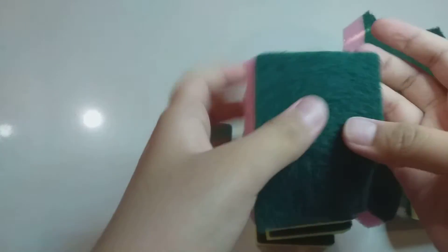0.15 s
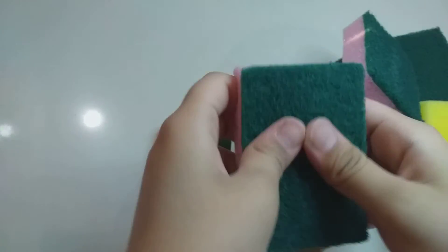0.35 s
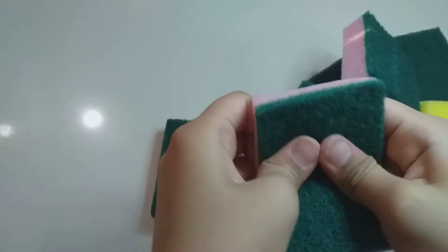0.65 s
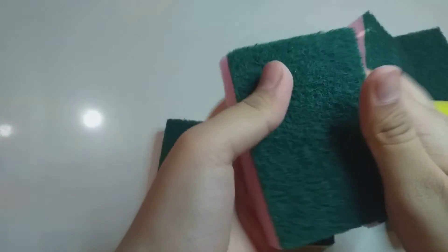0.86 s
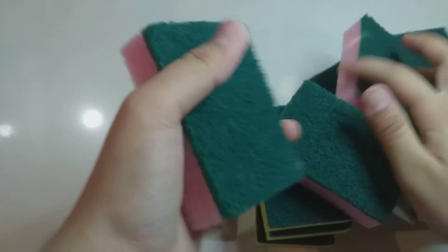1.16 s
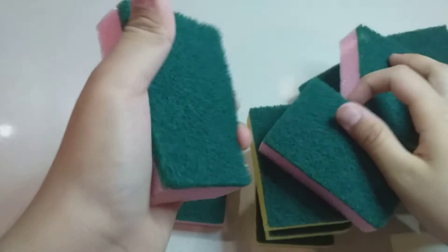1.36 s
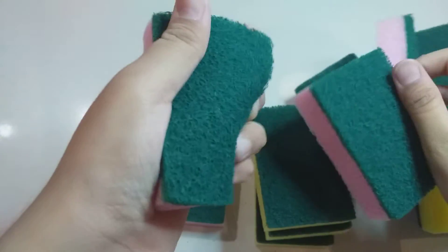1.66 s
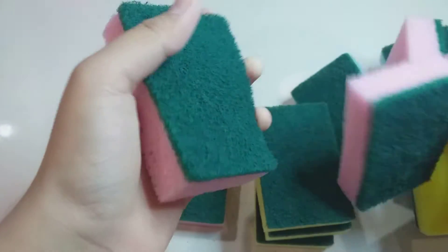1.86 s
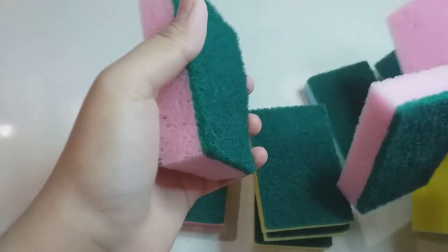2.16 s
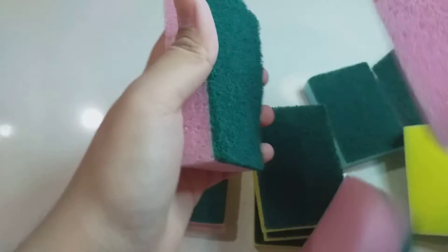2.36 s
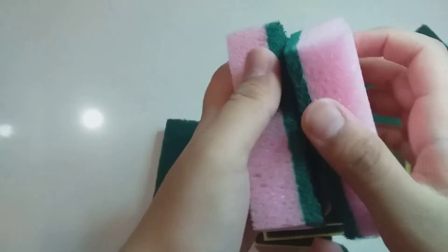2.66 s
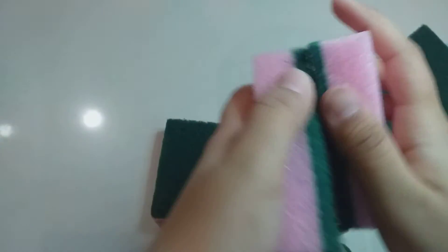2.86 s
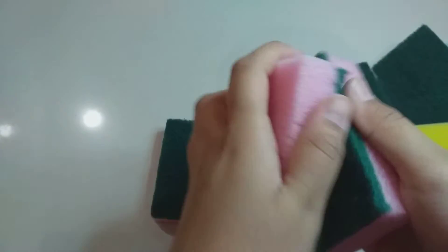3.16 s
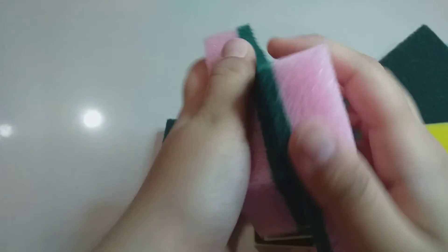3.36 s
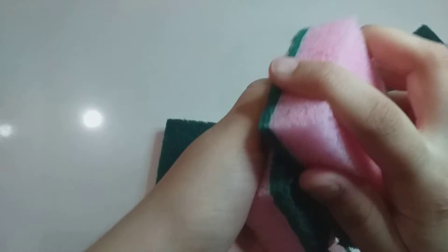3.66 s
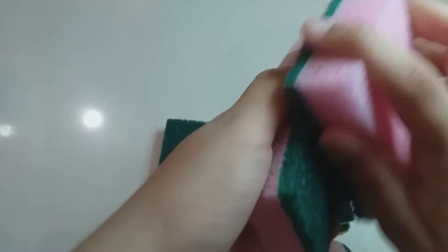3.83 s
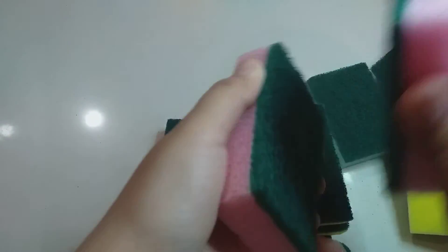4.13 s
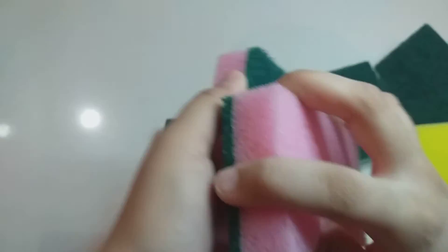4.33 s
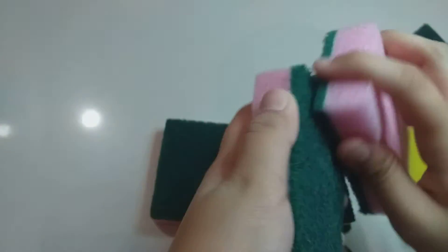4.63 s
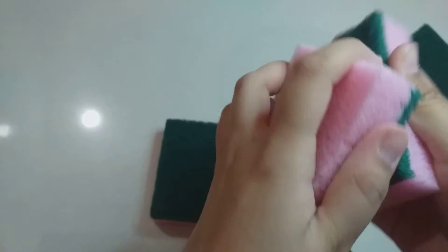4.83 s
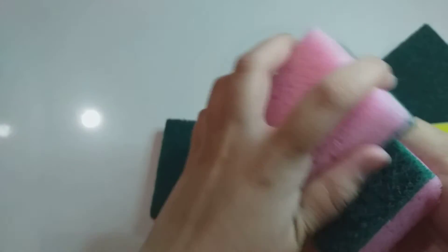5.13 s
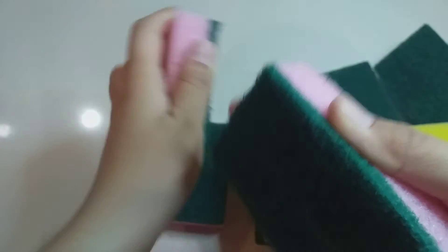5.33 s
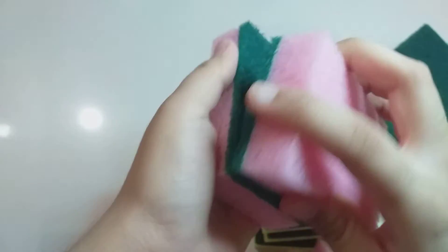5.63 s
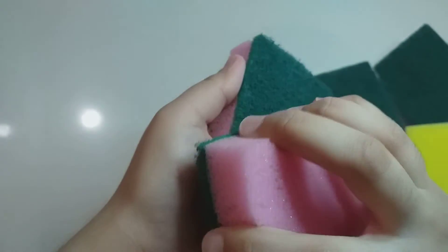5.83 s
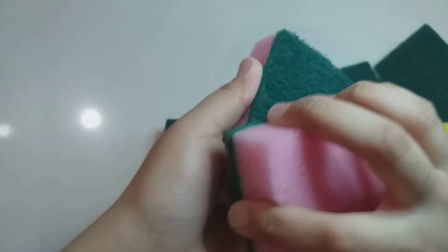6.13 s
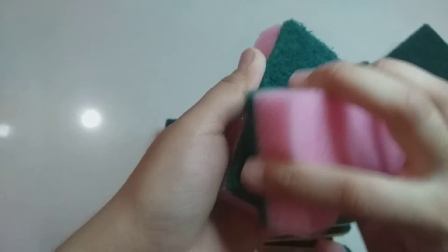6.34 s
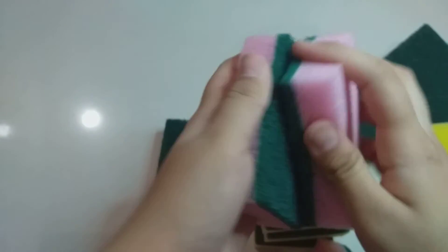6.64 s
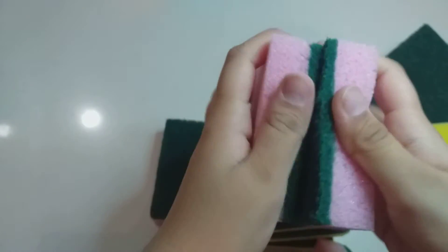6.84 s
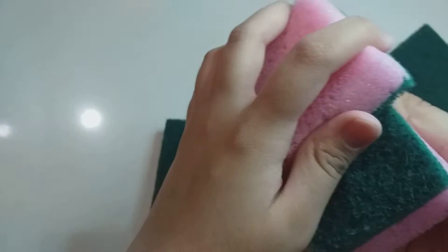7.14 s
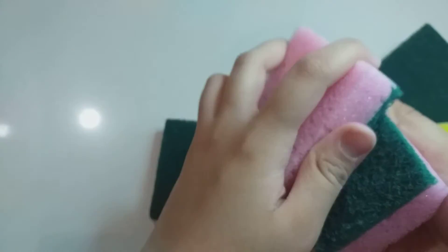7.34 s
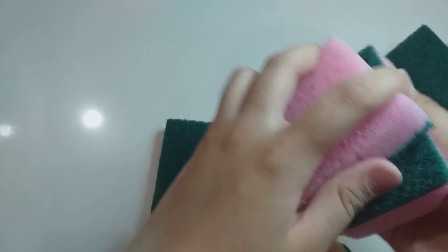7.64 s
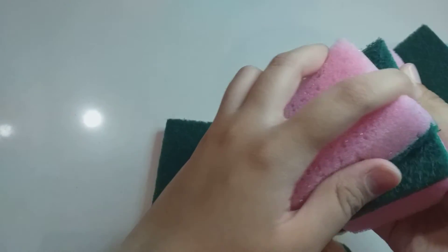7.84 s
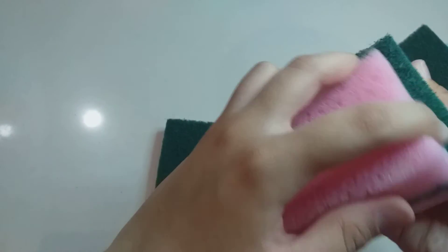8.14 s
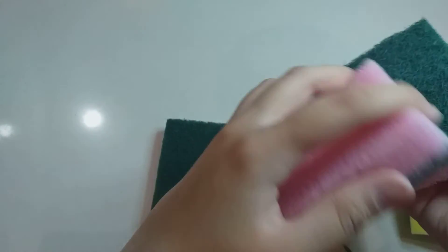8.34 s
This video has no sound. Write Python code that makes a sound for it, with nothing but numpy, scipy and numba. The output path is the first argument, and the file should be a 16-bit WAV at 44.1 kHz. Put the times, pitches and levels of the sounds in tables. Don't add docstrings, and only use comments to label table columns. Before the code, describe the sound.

Dry, stiff scrub pads rasp and crackle against each other very close, with soft knocks and foam squashes over faint room rumble.

```python
import sys
import numpy as np
from scipy import signal
from scipy.fft import rfft, irfft
from scipy.io import wavfile
from scipy.ndimage import uniform_filter1d
from numba import njit

SR = 44100
rng = np.random.default_rng(int(sys.argv[2]) if len(sys.argv) > 2 else 0)


def makeup_ratio(level_db):
    decades = np.asarray(level_db, float) / 20
    return 10 ** decades


def to_wav(s):
    ch = np.atleast_2d(s).T
    pcm = np.round(np.clip(ch, -1, 1) * 32767)
    wavfile.write(sys.argv[1], SR, pcm.astype(np.int16))


N = 374409
T = np.arange(N) / SR


def level(x, db):
    return x * makeup_ratio(db) / np.sqrt(np.mean(x ** 2))


def band(x, lo_hz, hi_hz, order=2):
    return signal.sosfilt(signal.butter(order, [lo_hz, hi_hz], "band", fs=SR, output="sos"), x)


def colour(x, points):
    hz, db = np.transpose(points)
    bins_hz = np.arange(2049) * SR / 4096
    log_gain = np.interp(np.log(bins_hz + 1), np.log(hz), db) * np.log(10) / 20
    cepstrum = irfft(log_gain)
    cepstrum[1:2048] *= 2
    cepstrum[2049:] = 0
    return signal.fftconvolve(x, irfft(np.exp(rfft(cepstrum))))[:N]


def walk(rate):
    hold = int(SR / rate)
    steps = np.repeat(rng.standard_normal(N // hold + 1), hold)
    return 1.69 * uniform_filter1d(steps, hold)[:N]


# centre in Hz, spread in Hz, level in dB.
LAMP_WHINE = [
    (10415, 1500, -85),
    (15260, 400, -91),
]
# pitch in Hz, level in dB.
ROOM_HUM = [
    (242, -64.5),
    (657, -67),
]


def lamps():
    offsets_hz = 299.2 * np.arange(-5, 5)
    waver = 1.5 * walk(13)
    whine = np.zeros(N)
    for centre_hz, spread_hz, db in LAMP_WHINE:
        for offset_hz in offsets_hz:
            line_db = db - 5.4 * (offset_hz / spread_hz) ** 2
            if line_db > -97:
                whine += makeup_ratio(line_db) * np.sin(2 * np.pi * (centre_hz + offset_hz) * T + waver)
    out = makeup_ratio(5.5) * whine
    for hz, db in ROOM_HUM:
        out += makeup_ratio(db + 3.2 * walk(3.03)) * np.sin(2 * np.pi * hz * T + 0.6 * walk(9))
    return out


# frequency in Hz, density in dB per Hz.
ROOM_COLOUR = [(40, -24), (56, -1), (80, -7.5), (112, -1), (165, -1), (310, -3.5), (440, -15), (660, -10.5),
               (1400, -18.5), (4000, -26.5), (5800, -31.5), (9500, -28.5), (13200, -37.5), (15700, -33)]
# time in seconds, pitch in Hz, level in dB.
MOTOR = [
    (.5, 55.6, -75),
    (.65, 55.3, -64),
    (.9, 56.2, -56),
    (1.65, 57.5, -70),
    (1.75, 56.3, -80),
    (3.95, 55.9, -80),
    (4.1, 56.3, -64),
    (4.65, 56.4, -54),
    (5.2, 57, -55),
    (5.35, 57.5, -74.5),
]


def room():
    air = colour(rng.standard_normal(N), ROOM_COLOUR)
    rumble_waver = band(air, 13, 430) * (makeup_ratio(1.4 * walk(12)) - 1)
    air = level(air + rumble_waver, -49.5)
    s, hz, db = np.transpose(MOTOR)
    turn = 2 * np.pi * np.cumsum(np.interp(T, s, hz)) / SR
    motor_gain = makeup_ratio(np.interp(T, s, db) + 1.5 * walk(8.6))
    motor = motor_gain * np.sqrt(2) * (np.sin(turn) + 0.23 * np.sin(2 * turn))
    return air + motor + lamps()


def walls(x, t60_s, wet_db):
    t = np.arange(SR // 2) / SR
    tail = rng.standard_normal(len(t)) * np.exp(-np.log(1000) * t / t60_s) * (t > .003)
    tail *= makeup_ratio(wet_db) / np.sqrt(np.sum(tail ** 2))
    return x + signal.fftconvolve(x, tail)[:N]


# start in seconds, peak in dB, pitch in Hz, ring in seconds, slap in dB relative to the knock.
THUDS = [
    (0.248, -43, 148, 0.074, -14),
    (2.229, -41, 205, 0.068, 7.5),
    (2.537, -27, 140, 0.03, -11),
    (2.596, -35.5, 105, 0.049, -4),
    (2.919, -47, 160, 0.06, 1),
    (3.941, -31, 102, 0.11, -10),
    (4.3, -43, 83.4, 0.067, -15),
    (4.659, -39, 73.4, 0.071, -3),
    (5.251, -28, 161, 0.085, -1),
    (6.428, -43, 190, 0.054, 1),
]


def thuds():
    out = np.zeros(N)
    t = np.arange(6000) / SR
    for (s, db, hz, t60_s, slap_db), noise in zip(THUDS, rng.standard_normal((len(THUDS), len(t)))):
        knock = np.sin(2 * np.pi * hz * t) + 0.41 * np.sin(2 * np.pi * 2.57 * hz * t)
        knock *= np.exp(-np.log(1000) * t / max(t60_s, .01))
        slap = band(noise * np.exp(-t / 0.007), 350, 1100)
        slap *= makeup_ratio(slap_db + 0.5) / np.max(np.abs(slap))
        out[int(s * SR):][:len(t)] += makeup_ratio(db) * (knock + slap)
    return out


def swells(rows, lo_hz, hi_hz, grit):
    coarse = T[::32]
    swell = sum(makeup_ratio(db) * np.exp(-((coarse - s) / half_s) ** 4) for s, db, half_s in rows)
    grains = rng.standard_normal(N) * makeup_ratio(grit * walk(300))
    return np.interp(T, coarse, swell) * level(band(grains, lo_hz, hi_hz), 0)


# middle in seconds, level in dB, half length in seconds.
BRUSHES = [(.54, -59, 0.073), (.82, -60, .06), (1.75, -69, .03), (3.93, -48.5, 0.071), (4.59, -50, .07),
           (6.2, -55, 0.064), (6.45, -56, .07), (7.03, -65, .08), (8.27, -55.5, .08), (3.74, -58, .05),
           (7.98, -60, .06), (7.7, -58, .05), (2.1, -68, .04)]


def brushes():
    return swells(BRUSHES, 6200, 14000, grit=4.5)


# middle in seconds, level in dB, half length in seconds.
SQUASHES = [
    (1.25, -60, 0.22),
    (3.27, -41.5, 0.075),
    (3.52, -40.5, 0.072),
    (5.33, -38, 0.057),
    (6.98, -50, 0.1),
    (7.7, -47, 0.064),
    (7.97, -47.5, 0.052),
    (8.26, -42.5, 0.06),
]


def squashes():
    return swells(SQUASHES, 137, 434, grit=2.8)


# middle in seconds, level in dB, half length in seconds.
HOLLOWS = [(3.93, -38.5, .06), (4.57, -36.5, 0.045), (5.86, -49, 0.096), (6.17, -48.5, 0.057),
           (6.02, -50, 0.028), (3.1, -46, .04), (3.43, -45, .06), (3.55, -46, .03), (7.0, -47, .07),
           (2.03, -58, .015), (2.64, -56, .03)]


def hollows():
    return swells(HOLLOWS, 610, 1430, grit=4.3)


# start in seconds, peak in dB.
PEELS = [(0.4794, -48), (0.4914, -46), (0.5232, -41), (0.5314, -39), (0.5404, -47), (0.5576, -43),
         (0.5844, -46), (0.6354, -50), (1.7544, -48), (2.0792, -35), (2.1944, -48), (2.2967, -48),
         (5.4974, -48), (5.5024, -47), (5.5114, -49), (5.5244, -49), (5.5524, -48), (5.5694, -48),
         (5.5814, -47), (5.5882, -47), (5.6044, -47), (5.6144, -47), (5.6214, -45), (5.6384, -50),
         (5.6454, -48), (5.657, -47), (5.6784, -49), (5.7014, -48)]


def peels():
    out = np.zeros(N)
    t = np.arange(200) / SR
    for (s, db), noise in zip(PEELS, rng.standard_normal((len(PEELS), len(t)))):
        tick = band((noise + 4.0 * (t == 0)) * np.exp(-t / .0004), 2800, 12500, order=1)
        out[int(s * SR):][:len(t)] += makeup_ratio(db + 2) * tick / np.max(np.abs(tick))
    return out


# frequency in Hz, density in dB per Hz.
SNAP_COLOUR = [(60, -32), (110, -9), (400, -7), (1150, -5), (1900, -8), (2150, -4.5), (4700, -5.5),
               (5000, -6), (5750, -16.5), (8000, -18), (8700, -21.5), (11000, -26), (13200, -35),
               (15700, -33.5)]
# centre in Hz, width in Hz, gain in dB.
SNAP_PEAKS = [
    (758, 123, 6.5),
    (2950, 160, 2.5),
    (4460, 150, 3.5),
]


def snap_colour(x):
    x = colour(x, SNAP_COLOUR)
    lifts = [(makeup_ratio(db) - 1) * band(x, hz - width / 2, hz + width / 2, order=1) for hz, width, db in SNAP_PEAKS]
    return x + sum(lifts)


# start in seconds, level in dB, pitch in Hz, length in ms.
SLIPS = [(.292, -46, 3470, 5.7), (.3645, -43, 4910, 5.8), (.5264, -47.5, 3020, 6.8), (.855, -44, 2760, 2.9),
         (1.13, -50, 2620, 9), (1.1487, -46.5, 3040, 7.5), (1.4213, -48, 4580, 8.4),
         (1.7371, -47, 3900, 3.1), (1.9413, -50, 3690, 5.2), (2.0239, -42.5, 2730, 4.5),
         (2.6233, -43, 3570, 4.3), (2.6314, -34.5, 3460, 3), (2.7524, -45.5, 4930, 6.4),
         (2.847, -34.5, 3560, 6.8), (3.1069, -28, 3630, 1.6), (3.22, -25, 3000, 11), (3.4265, -22, 3800, 2),
         (3.5037, -23.5, 3150, 3.6), (3.6978, -26, 2820, 2.1), (3.73, -32, 3640, 8),
         (3.7778, -26, 1710, 2.8), (3.8286, -25.5, 3720, 12), (3.877, -33, 3330, 11.4),
         (4.3087, -45, 3670, 9), (4.74, -25, 3110, 2), (5.056, -32, 4910, 2), (5.191, -30, 4760, 9),
         (5.734, -38, 3040, 11), (5.883, -36, 2450, 6), (5.976, -33, 3620, 8.3), (6.0075, -28.5, 2980, 3),
         (6.0979, -39, 4350, 2), (6.1322, -35, 4500, 12), (6.1827, -30, 2570, 15), (6.231, -23, 3570, 2.5),
         (6.222, -29, 3900, 9), (6.245, -33, 3000, 6), (5.845, -34, 3500, 5), (6.27, -31.5, 3670, 7.1),
         (6.365, -44, 3400, 10), (6.3948, -25.5, 3450, 6.5), (6.6299, -32, 4300, 10),
         (7.269, -35, 4400, 12), (7.2983, -33, 2590, 5.1), (7.3294, -33.5, 4400, 13),
          (7.3366, -23.5, 4270, 3.3), (7.365, -32, 2640, 11), (7.3783, -32, 4430, 15),
          (7.3919, -31, 2740, 2.6), (7.414, -30.5, 1580, 9.7), (7.4864, -28, 4770, 8.3),
          (7.5163, -40, 4530, 9), (7.575, -41, 1580, 5), (7.5905, -27, 4450, 1.6), (7.5963, -30, 2950, 1.9),
          (7.6094, -32, 4830, 7.3), (7.6209, -36, 4230, 1.8), (7.641, -25, 2370, 3.1),
          (7.657, -24, 3040, 8), (7.7007, -29, 4320, 20), (7.718, -26, 3000, 3), (7.7401, -31, 4440, 15),
          (7.7796, -27.5, 3260, 4.4), (7.8663, -38.5, 3730, 10), (7.8987, -36.5, 3540, 11),
          (7.9295, -36, 2800, 12), (8.008, -27, 2890, 5.2), (8.084, -29, 2590, 6.1),
          (8.2057, -34, 4540, 7.6), (8.2116, -27, 4370, 9.4), (8.409, -40, 2280, 3.9),
         (.2219, -52, 3270, 4), (.9916, -46, 2890, 8), (1.2231, -49, 3000, 4), (1.6197, -46, 3990, 5),
         (1.8128, -48, 2720, 8), (1.838, -39, 2960, 3), (2.0797, -46, 2190, 3), (2.1061, -47, 2410, 3),
         (2.2179, -52, 3800, 3), (2.806, -43.5, 3290, 5), (3.247, -28, 4480, 8), (3.455, -25, 3500, 2),
         (3.5308, -29, 4290, 8), (3.545, -23, 4300, 5), (3.6311, -33, 2230, 8), (4.3779, -40, 4500, 6.3),
         (4.3913, -34, 4400, 6), (4.5061, -31, 3680, 6), (4.537, -32, 3250, 5.5), (4.5545, -22, 4160, 6),
         (4.8473, -33, 2990, 5), (4.8785, -29, 4280, 5), (5.1488, -29, 2820, 5), (5.739, -34.5, 2970, 3),
         (5.77, -35, 2470, 4), (6.1214, -36, 3930, 4), (6.3783, -31, 3410, 2.7), (6.4292, -25, 3770, 4),
         (6.5733, -37, 2620, 6), (6.8956, -31, 2560, 4), (6.9535, -28, 4240, 6), (7.022, -23.5, 4400, 6.4),
         (7.056, -28, 3000, 3), (7.125, -33, 3000, 3)]


def slips():
    out = np.zeros(N)
    t = np.arange(2500) / SR
    unit = np.std(band(snap_colour(rng.standard_normal(SR)), 1500, 5400))
    rows = SLIPS
    for (s, db, hz, ms), noise in zip(rows, rng.standard_normal((len(rows), 2, len(t)))):
        length_ms = max(ms, 1)
        body_db = -13 + 3.5 * np.log2(length_ms / 5)
        age = t * 1000 / length_ms
        fade = np.exp(-.7 * age - age ** 4)
        snaps = (noise[0] * np.abs(noise[0]) * 0.37 + 6.0 * (t == 0)) * fade
        crack = band(snaps, 840, 12000, order=1)
        crack += 1.4 * band(snaps, hz * 0.88, hz * 1.13, order=1)
        crack *= np.sqrt(np.sum(fade ** 2) / np.sum(band(crack, 1500, 5400) ** 2))
        tips = band(snaps, 5800, 15600)
        body = band(noise[1] * fade, 450, 2300, order=1)
        burst = crack + makeup_ratio(-3.0) * tips + makeup_ratio(body_db + 14.0) * body
        out[int(s * SR):][:len(t)] += makeup_ratio(db) * burst
    return snap_colour(out) / unit * makeup_ratio(-9.5)


# top in seconds, level in dB, rise in seconds, fall in seconds, press in dB.
FINGERING = [(0.023, -55, 0.336, 0.039, 2.6), (0.113, -58, 0.051, 0.076, -0.5),
             (0.167, -60, 0.012, 0.29, 0), (0.296, -54.5, 0.033, 0.023, -8),
             (0.366, -51.5, 0.015, 0.059, 0), (0.486, -58, 0.032, 0.117, 4),
             (0.568, -58.0, 0.185, 0.072, 6), (0.856, -48.5, 0.13, 0.037, -5.5),
             (1.002, -48.5, 0.042, 0.043, -1), (1.081, -54, 0.14, 0.022, -1.0),
             (1.149, -51, 0.032, 0.025, -21), (1.257, -54, 0.091, 0.122, -2),
             (1.419, -51.5, 0.057, 0.079, 1.0), (1.505, -57, 0.045, 0.178, 0),
             (1.625, -51, 0.043, 0.092, 0), (1.753, -50, 0.072, 0.028, -1), (1.841, -50, 0.06, 0.069, -3),
             (1.973, -52, 0.12, 0.028, 9), (2.094, -51.5, 0.26, 0.11, -0.5),
             (2.233, -58.5, 0.029, 0.37, -1.8), (2.474, -57.5, 0.07, 0.25, 5),
             (2.628, -46.5, 0.055, 0.1, 1)]
# top in seconds, level in dB, rise in seconds, fall in seconds, press in dB.
STROKES = [(2.753, -47, 0.011, 0.1, 2), (2.931, -33.5, 0.13, 0.076, 3), (2.986, -28.5, 0.14, 0.1, -2.5),
           (3.159, -28.5, 0.16, 0.098, 1), (3.283, -24.5, 0.14, 0.17, 4), (3.421, -31.5, 0.3, 0.13, -2),
           (3.588, -27.5, 0.25, 0.019, 1.5), (3.639, -36.5, 0.23, 0.024, -0.5),
           (3.76, -29.5, 0.082, 0.046, -3), (3.832, -30.5, 0.013, 0.045, 5),
           (3.884, -25.5, 0.01, 0.13, 3.5), (3.998, -20.5, 0.16, 0.024, 1.5), (4.317, -45, 0.018, 0.124, 4),
           (4.397, -35.5, 0.035, 0.082, 4), (4.564, -23.5, 0.068, 0.24, 0),
           (4.619, -23.5, 0.093, 0.19, -2.5), (4.89, -32.5, 0.059, 0.22, 5),
           (4.982, -28, 0.088, 0.088, -3.5), (5.116, -25.5, 0.082, 0.016, 2),
           (5.193, -25, 0.011, 0.17, -4.5), (5.292, -19.5, 0.16, 0.069, 5.5),
           (5.337, -21.5, 0.11, 0.045, 1)]
# top in seconds, level in
# dB, rise in seconds, fall in seconds, press in dB.
TWISTS = [(5.784, -38, 0.084, 0.26, 1.1), (5.888, -37.5, 0.027, 0.07, 2.8),
          (5.974, -40.5, 0.011, 0.096, 3.0), (6.028, -39.0, 0.05, 0.039, 3.3),
          (6.145, -38, 0.067, 0.023, 3.6), (6.221, -33.5, 0.075, 0.068, 2.6),
          (6.397, -29.5, 0.0075, 0.162, 3.1), (6.465, -25, 0.086, 0.1, 3.2), (6.677, -31.5, 0.13, 0.14, 3),
          (6.849, -33.5, 0.16, 0.046, 1.7), (7.049, -27.5, 0.33, 0.11, 3), (7.133, -35, 0.037, 0.048, 2.1),
          (7.277, -39.5, 0.18, 0.07, 2.8), (7.332, -34.5, 0.012, 0.12, 3.3), (7.42, -41, 0.015, 0.012, 0.2),
          (7.488, -35, 0.024, 0.026, 0.4), (7.604, -43, 0.036, 0.14, 1.1),
          (7.666, -23.5, 0.015, 0.021, 2.5), (7.705, -26.5, 0.019, 0.086, 1.2),
          (7.948, -31, 0.055, 0.12, 1.9), (8.015, -33, 0.14, 0.061, 2.1), (8.089, -39.5, 0.014, 0.023, 2.9),
          (8.217, -29.5, 0.03, 0.2, 2.3), (8.313, -35, 0.22, 0.089, 3.6),
          (7.45, -40, 0.033, .04, 4),
    (7.54, -47.5, .04, 0.034, -2),
    (3.94, -23.5, .04, 0.054, 7),
]


def effort():
    swing_db, roundness = 19, 1.55
    rest_db = -70
    power, pressed = np.full(N, makeup_ratio(2 * rest_db)), np.zeros(N)
    for s, db, rise_s, fall_s, press_db in FINGERING + STROKES + TWISTS:
        near = slice(max(int((s - .6) * SR), 0), int((s + .8) * SR))
        age = T[near] - s
        swing = np.where(age < 0, -age / max(rise_s, .004), age / max(fall_s, .004)) ** roundness
        settle = makeup_ratio(2 * (-27 - 80 * age)) * np.clip(age / .03, 0, 1)
        push = makeup_ratio(2 * db) * (makeup_ratio(-2 * swing_db * swing) + settle)
        power[near] += push
        pressed[near] += push * press_db
    return 10 * np.log10(power), pressed / power


def fibres(density, spread_db, own_db, shift_db):
    chance = rng.random((2, N))
    sizes = makeup_ratio(spread_db * np.minimum(-np.log(chance[1]), 4))
    snaps = (chance[0] < density) * sizes
    centres = 110 * 2 ** np.arange(0, 7.5, .5)
    parts = []
    for hz, own in zip(centres, rng.standard_normal((len(centres), N))):
        own_gain = np.sign(own) * makeup_ratio(own_db * np.minimum(np.abs(own), 2))
        part = band(snaps * own_gain, hz / 2 ** .25, hz * 2 ** .25)
        power = uniform_filter1d(part ** 2, size=int(1500 + 25 * SR / hz))
        even = np.sqrt(hz / (power + 1e-12))
        parts.append(part * even * makeup_ratio(shift_db * walk(14)))
    return centres, parts


@njit
def svf(x, hz, k):
    y, b, l = np.empty(len(x)), 0., 0.
    for i in range(len(x)):
        g = np.tan(np.pi * hz[i] / SR)
        v = (b + g * (x[i] - l)) / (1 + g * (g + k))
        b, l, y[i] = 2 * v - b, l + 2 * g * v, k * v
    return y


# time in seconds, centre in Hz, gain in dB.
CUP = [
    [(0.0, 3350, 1), (0.15, 3020, 5), (0.58, 3650, 3.5), (0.64, 3020, 5), (2.47, 3280, 3.5),
     (2.62, 3720, 3), (2.75, 3140, 1)],
    [(2.8, 3450, 5), (2.892, 3640, 2.5), (3.012, 3020, 5.5), (3.292, 4150, 2.5), (3.39, 3250, 6),
     (3.496, 3740, 4), (3.65, 3360, 2)],
    [(3.68, 3080, -1), (3.798, 3560, 4), (3.97, 3790, 3), (4.224, 3260, 5), (4.388, 4060, 3),
     (4.65, 3170, 4.5), (4.8, 3300, 5)],
    [(4.82, 3730, 4), (4.896, 3860, 3), (5.006, 3000, 1), (5.076, 3840, 4), (5.122, 3400, 4.5),
     (5.35, 4000, 3.5), (5.45, 3030, 2)],
    [(5.7, 3580, 4.5), (5.892, 3140, 0), (5.938, 3940, 4.5), (6.202, 3500, 3), (6.226, 3750, 5),
     (6.474, 3490, 4), (6.6, 3950, 6)],
    [(6.62, 3620, 4), (6.79, 3210, 4), (6.952, 3970, 2), (6.998, 3980, 3), (7.074, 3370, 3.5),
     (7.2, 3900, 3)],
    [(7.25, 3840, 3), (7.42, 3290, 3), (7.444, 3660, 2.5), (8.058, 3540, 2), (8.338, 3830, 2),
     (8.48, 3290, 4)],
]


def cupped(x):
    s, hz, db = np.concatenate(CUP).T
    lift = makeup_ratio(np.interp(T, s, db)) - 1
    return x + lift * svf(x, np.interp(T, s, hz), 0.17)


# middle in seconds, depth in dB, half length in seconds.
STICKS = [(3.095, -3, .006), (3.212, -8, 0.0053), (3.241, -5, .004), (3.491, -1, .005), (3.517, -9, .005),
          (5.183, -4, 0.0056), (6.565, -3, .008), (6.626, -5.5, 0.0073), (6.883, -3, .008),
          (7.076, -9, 0.0044), (3.6, -1, .01), (5.135, -6, .01), (6.76, -3, .015), (6.965, -3, .015),
          (6.2, -5, .006), (6.239, -7, .004), (6.257, -7, .006), (5.86, -5, .008), (7.497, -4, .004),
          (7.685, -5, .008), (3.724, -3, .005), (7.603, -5, .004), (7.647, -5, .005)]


def sticking():
    coarse = T[::32]
    dip_db = sum(db * np.exp(-((coarse - s) / half_s) ** 2) for s, db, half_s in STICKS)
    return makeup_ratio(np.interp(T, coarse, dip_db))


def sponges():
    rub_db, bright_db = effort()
    soft_db = -30 - rub_db
    body_db = -7.5 + 0.57 * bright_db + 0.1 * soft_db
    tips_db = -12 + 0.72 * bright_db + 0.13 * soft_db
    low_db = rub_db - 10 * np.log10(1 + makeup_ratio(2 * bright_db))
    judder = makeup_ratio(0.12 * walk(45) + 0.96 * walk(200))
    density = np.clip(7000 / SR * makeup_ratio(.25 * (rub_db + 31.5)), .08, .6)
    centres, parts = fibres(density, spread_db=2.0, own_db=4.0, shift_db=0.68)
    layers = ((0, 1500, (620, 1095), body_db), (1500, 3000, (1100, 7500), 0.0042),
              (3000, 5700, (3400, 5400), bright_db), (5700, 2e4, (6000, 15000), tips_db))
    out = np.zeros(N)
    for lo_hz, hi_hz, level_band, db in layers:
        swarm = sum(part for hz, part in zip(centres, parts) if lo_hz < hz < hi_hz)
        layer = snap_colour(swarm * judder)
        out += layer * makeup_ratio(db) / np.std(band(layer, *level_band, order=4))
    return cupped(out) * makeup_ratio(low_db - 2.5) * sticking() + slips()


def scene():
    hands = brushes() + squashes() + hollows()
    rubbing = walls(sponges() + thuds(), t60_s=0.3, wet_db=-21.5)
    return (rubbing + room() + hands + peels())[None]


def band_limit(x):
    return signal.sosfilt(signal.butter(12, 16770, fs=SR, output="sos"), x)


def record(dry):
    x = signal.sosfilt(signal.butter(4, 46, "high", fs=SR, output="sos"), dry)
    x = signal.sosfilt(signal.ellip(12, .2, 80, 15720, fs=SR, output="sos"), x)
    return band_limit(x)


dry = scene()
out = record(dry)
to_wav(out)
```